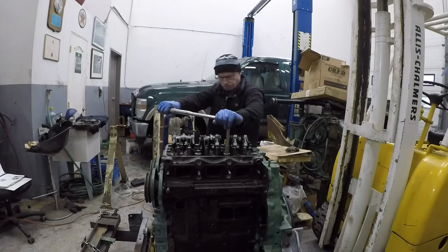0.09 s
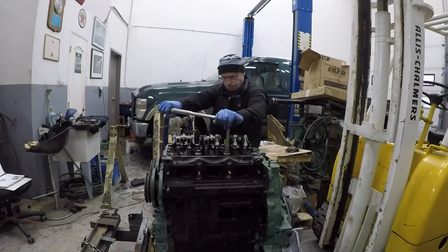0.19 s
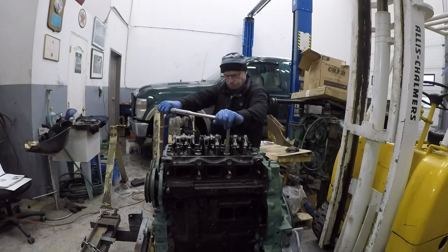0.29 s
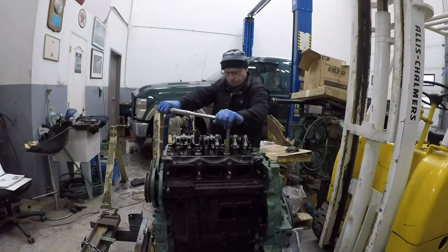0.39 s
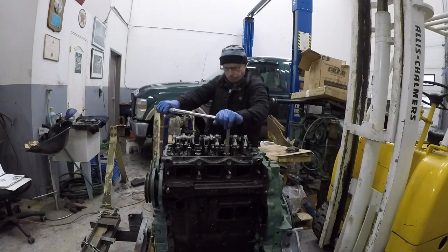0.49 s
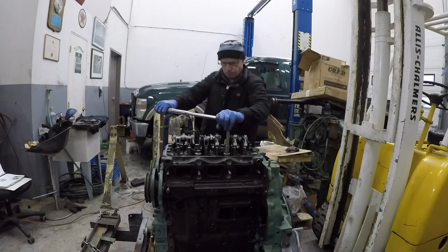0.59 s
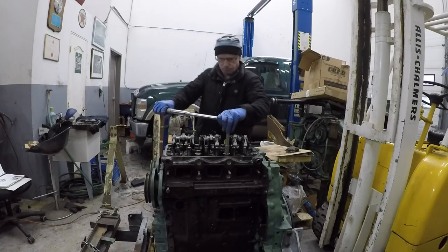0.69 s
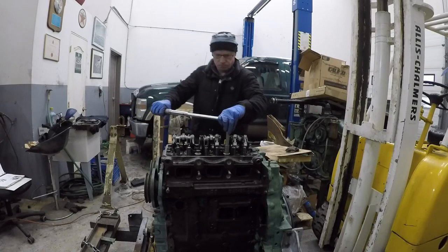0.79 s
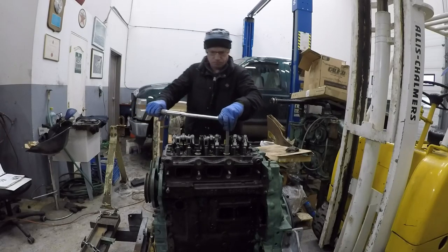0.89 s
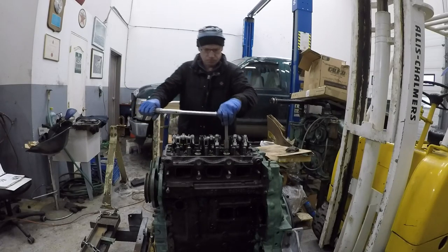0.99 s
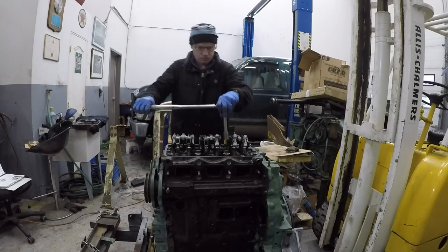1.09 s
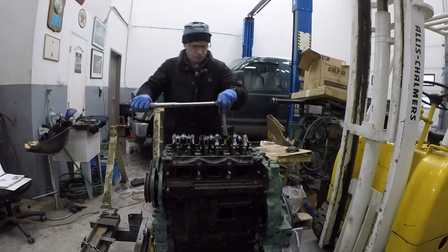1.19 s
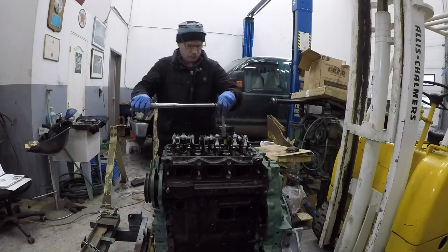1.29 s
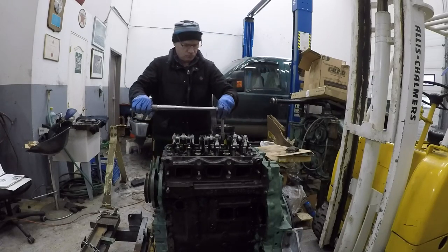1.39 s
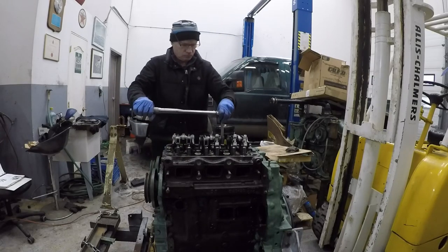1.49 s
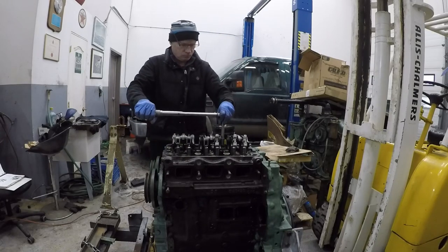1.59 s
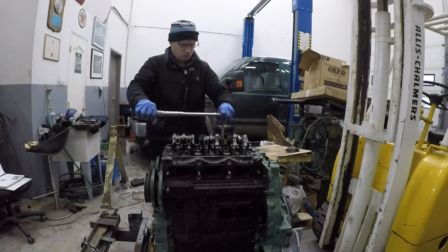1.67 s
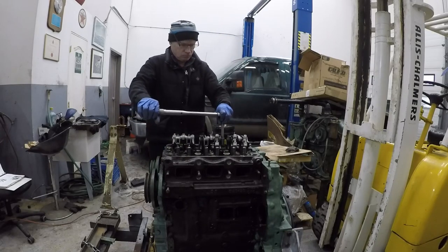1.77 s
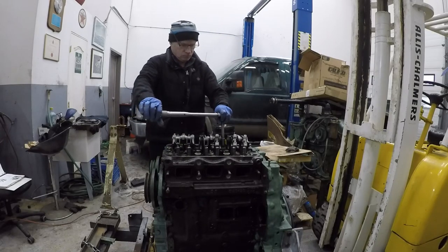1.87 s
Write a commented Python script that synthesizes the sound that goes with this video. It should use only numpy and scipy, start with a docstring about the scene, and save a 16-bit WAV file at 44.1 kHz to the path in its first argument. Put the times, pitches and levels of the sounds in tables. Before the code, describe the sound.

Torque wrench gives two sharp metallic clicks, echoing through a large hard-walled workshop, over low rumble

```python
"""Two sharp metallic clicks in a large hard-walled workshop, each swelling into a long hall tail; soft
handling sounds and light ticks follow over a low room rumble. A click-type torque wrench breaks over on an
engine bolt and snaps back: touches ring steel modes and fire noise cracks. Noise tails make the hall;
banded noise, a low drone and a throbbing whine make the room tone."""
import sys
import numpy as np
from scipy import signal
from scipy.io import wavfile
from scipy.ndimage import map_coordinates

SR = 44100
rng = np.random.default_rng(int(sys.argv[2]) if len(sys.argv) > 2 else 0)


def inscribe(sig):
    """Save sig as 16-bit PCM at rate SR to the path in sys.argv[1].

    A 1-D sig is mono; a 2-D sig holds one channel per row.
    Samples are clipped to [-1, 1] before scaling.
    """
    pcm = np.round(np.clip(np.atleast_2d(sig).T, -1, 1) * 32767)
    wavfile.write(sys.argv[1], SR, pcm.astype(np.int16))


N = 83790

# metal touches as the wrench breaks over, snaps back, ticks: (time [s], level [dB])
BREAK_TOUCHES = [(.2115, -11), (.2128, -27)]
RESET_TOUCHES = [(0.7405, -12), (0.7423, -47)]
TICK_TOUCHES = [(1.7398, -39.5), (1.7408, -42), (1.7427, -38), (1.7443, -46), (1.751, -47), (1.759, -60)]


def from_db(db):
    """Gain of a level."""
    return 10 ** (np.asarray(db) / 20)


def rms_one(x):
    """Scale to unit rms."""
    return x / np.sqrt(np.mean(x ** 2) + 1e-20)


def at_hz(points, hz, column=1):
    """Read a column of a spectrum table on a log-frequency axis."""
    points = np.array(points)
    return np.interp(np.log(hz), np.log(points[:, 0]), points[:, column])


def left_right(balance_db):
    """Column of left and right gains for a left-minus-right level."""
    return from_db([[balance_db / 2], [-balance_db / 2]])


def high_pass(x, order, edge_hz):
    """Butterworth high-pass."""
    return signal.sosfilt(signal.butter(order, edge_hz, "high", fs=SR, output="sos"), x)


def decay_per_sample(t60_s):
    """Factor that loses 60 dB in t60."""
    return from_db(-60 / (t60_s * SR))


def ring(drive, hz, t60_s):
    """Two-pole resonator: a unit click starts a decaying sine of height 1."""
    r = decay_per_sample(t60_s)
    w = 2 * np.pi * hz / SR
    return signal.lfilter([0, np.sin(w)], [1, -2 * r * np.cos(w), r * r], drive + 1e-18)


def noise_bands(size):
    """Third-octave bands of mid and side noise, neighbours unrelated."""
    edges_hz = 22 * 2 ** np.arange(0, 9.9, 1 / 3)
    white = rng.standard_normal((2, 2, size))
    for k, (low, high) in enumerate(zip(edges_hz, edges_hz[1:])):
        band_pass = signal.butter(2, [low, high], "band", fs=SR, output="sos")
        yield np.sqrt(low * high), signal.sosfilt(band_pass, white[k % 2])


def pair(mid_side, alike):
    """Mix mid and side into left and right of a given likeness (correlation)."""
    alike = np.clip(alike, -1, 1)
    mid = np.sqrt(1 + alike) * mid_side[0]
    side = np.sqrt(1 - alike) * mid_side[1]
    return mid + side * np.array([[1], [-1]])


def rumble(swell_db):
    """Unit-rms banded noise; the swell fades out towards the high bands."""
    # room-tone spectrum: (frequency [Hz], relative level per Hz [dB])
    spectrum = [(15, -51.5), (25, -43), (108, -67), (159, -1), (273, -7.5), (330, -7), (410, -9.5),
                (584, -10), (1120, -14), (2460, -27), (2670, -27), (5270, -31.5), (8830, -29.5),
                (14400, -46.5), (16500, -61)]
    # (frequency [Hz], left-right likeness [-1 to 1])
    likeness = [(60, 0.1), (130, -0.28), (290, -0.3), (640, -0.82), (1410, -0.65), (3100, 0.4),
                (6820, 0.08), (15000, 0.23)]
    # (frequency [Hz], left minus right [dB])
    balance = [(60, 2), (110, -0.5), (200, -1.5), (380, 2), (700, -0.5), (1290, -1), (2380, -1.5),
               (4400, 0.5), (8120, -7), (15000, 1.5)]
    half_swell_hz = 1520
    out = 0
    for hz, band in noise_bands(N + SR // 2):
        settled = band[:, -N:]
        band_swell_db = swell_db / (1 + (hz / half_swell_hz) ** 2)
        gain = from_db(at_hz(spectrum, hz) + band_swell_db)
        out = out + gain * pair(settled, at_hz(likeness, hz)) * left_right(at_hz(balance, hz))
    return rms_one(out)


def narrow_noise(hz, width_hz):
    """Stereo noise through a resonator of the given bandwidth."""
    return ring(rng.standard_normal((2, N)), hz, np.log(1000) / np.pi / width_hz)


def drone():
    """Low drone: unit-rms narrow noise, rolled off below its pitch."""
    return rms_one(high_pass(narrow_noise(hz=163, width_hz=15), order=4, edge_hz=144))


def whine():
    """Faint thin whine: unit-rms narrow noise throbbing at mains rate."""
    throb_hz, depth = 60, .9
    throb = 1 + depth * np.sin(2 * np.pi * throb_hz * np.arange(N) / SR)
    return rms_one(narrow_noise(hz=8640, width_hz=45) * throb)


def room_tone():
    """Rumble and drone swell slowly under a steady level of throbbing whine."""
    # room-tone level curve, before the lift: (time [s], level [dB])
    level_curve = [(0.0, -57), (0.12, -55.5), (0.544, -57.5), (0.804, -54), (0.968, -55.5), (1.142, -56.5),
                   (1.798, -54), (1.9, -54.5)]
    lift_db, drone_db, whine_db = 7.5, -62.5, -71
    s, db = np.transpose(level_curve)
    swell_db = np.interp(np.arange(N) / SR, s, db - db.mean())
    out = from_db(db.mean() + lift_db) * rumble(swell_db)
    out = out + from_db(drone_db + swell_db) * drone()
    return out + from_db(whine_db) * whine()


def steel_modes():
    """Each touch rings all bar modes; returns direct sound and near and far feeds.

    Neighbouring modes radiate in different directions, so each feed has two halves.
    """
    # wrench modes: (frequency [Hz], t60 before ring share [s], left minus right [dB],
    # relative level at break [dB], at reset [dB], at tick [dB])
    modes = [(353, 0.026, 16, -47, -33, -31), (426, 0.062, 3, -26, -28, -30),
             (640, 0.026, 24.5, -60, -25.5, -34), (840, 0.014, -12.5, -15, -19.5, -20),
             (1145, 0.0062, 2, -14.5, -11.5, -25), (1495, 0.017, 3, -13, -16, -11),
             (1860, 0.015, 8, -12, -10, -18), (2507, 0.0083, -9, -13, -9, 4.5),
             (3093, 0.018, 12, -24.5, -13, 1), (3290, 0.014, -8, -9, -6.5, -8),
             (3960, 0.016, -12, 0.5, -2, 1), (4250, 0.0077, 33, -12, -1.5, -0.5),
             (4630, 0.0031, -23, -7.5, 2.5, 8.5), (5920, 0.0055, 10, -13, -6.5, -36),
             (6350, 0.0033, 11, -5, 0, 4), (6745, 0.023, -13, -8.5, -13, -18),
             (7120, 0.018, -17, -7.5, -8.5, -4), (7460, 0.017, -16, -9, -6, -6),
             (7875, 0.019, -16, -13, -4.5, -10), (8500, 0.011, -21, -13, -12, -24),
             (9120, 0.0041, -24, -12, -14.5, -7), (9870, 0.0042, -29, -14.5, -18, -28),
             (11320, 0.005, -27, -24.5, -19.5, -10), (12100, .003, -20, -44, -19, -35),
             (13300, 0.0035, -5, -14.5, -14, -20), (15000, .005, -15, -28, -29, -29)]
    # share of t60 left by each contact: (break, reset, tick) [ratio]
    ring_share = [0.72, 0.56, 0.37]
    # feed of near echoes: (break, reset, tick) [dB]
    near_send_db = [-0.7, -4, 1.2]
    # feed of hall tail: (break, reset, tick) [dB]
    far_send_db = [-0.4, -0.5, -4.5]
    strength_spread_db, contact_t60_s = 2, .0012
    # keeps the height of a mode that builds up over a few cycles
    contact_gain = 2 * np.log(1000) / (contact_t60_s * SR)
    direct, near, far = np.zeros((2, N)), np.zeros((2, N)), np.zeros((2, N))
    for kind, touches in enumerate([BREAK_TOUCHES, RESET_TOUCHES, TICK_TOUCHES]):
        s, db = np.transpose(touches)
        at = (s * SR).astype(int)
        spread_db = strength_spread_db * rng.standard_normal((len(s), len(modes)))
        for k, (hz, t60_s, balance_db, *levels_db) in enumerate(modes):
            clicks = np.zeros(N)
            clicks[at] = (-1) ** k * from_db(db + levels_db[kind] + spread_db[:, k])
            push = ring(clicks, hz, contact_t60_s) * contact_gain
            tone = ring(push, hz, t60_s * ring_share[kind])
            direct += tone * left_right(balance_db)
            near[k % 2] += tone * from_db(near_send_db[kind])
            far[k % 2] += tone * from_db(far_send_db[kind])
    return direct, near, far


def cracks():
    """Toneless burst with each touch: differenced noise under a fast decay."""
    # burst level relative to the touch: (break, reset, tick) [dB]
    crack_db = [-33, -21, -17.5]
    t60_s = 0.0053
    clicks = np.zeros(N)
    for kind, touches in enumerate([BREAK_TOUCHES, RESET_TOUCHES, TICK_TOUCHES]):
        s, db = np.transpose(touches)
        clicks[(s * SR).astype(int)] = from_db(db + crack_db[kind])
    envelope = signal.lfilter([1], [1, -decay_per_sample(t60_s)], clicks)
    return envelope * np.diff(rng.standard_normal(N + 1))


def click_ring(s, db, hz, t60_s):
    """One click starts one decaying sine."""
    click = np.zeros(N)
    click[int(s * SR)] = from_db(db)
    return ring(click, hz, t60_s)


def tube_hum():
    """The handle tube hums on after the break as one slowly decaying mode."""
    return click_ring(BREAK_TOUCHES[0][0], db=-54, hz=3925, t60_s=0.3)


def handling():
    """Soft handling sounds, each a single decaying sine."""
    # (time [s], level [dB], pitch [Hz], t60 [s])
    sounds = [(1.548, -45, 6470, 0.0083), (1.549, -49, 8700, 0.0046), (1.552, -50, 3460, 0.019),
              (1.667, -49.5, 800, 0.049)]
    return sum(click_ring(*sound) for sound in sounds)


def wrench():
    """Sum the contact sounds into direct stereo, near feed and far feed."""
    left_lead_s = .00003
    direct, near, far = steel_modes()
    rest = cracks() + tube_hum() + handling()
    direct += rest
    direct[0] = map_coordinates(direct[0], [np.arange(N) + left_lead_s * SR], order=3)
    return direct, near + rest / 2, far + rest / 2


def hall(near_feed, far_feed):
    """Echoes off engine and floor die fast; the far walls' diffuse tail builds up, then fades by band."""
    # hall tail: (frequency [Hz], t60 [s], relative level [dB], left-right likeness [-1 to 1])
    tail_bands = [(370, 0.56, -19, 1), (650, 1.31, -26, 0.7), (1320, 0.99, -12, 0.029),
                  (2360, 1.045, -8, 0.29), (3460, 1.014, -23.5, 0.94), (4460, 1.065, -16.5, 0.74),
                  (6100, 0.81, -5.5, -0.12), (7940, 0.61, -12, -0.28), (11900, 0.56, 6.5, -0.1),
                  (14200, 0.25, -44.5, -0.17)]
    near_db, near_balance_db, near_t60_s, near_start_s = 9, -3, 0.074, .002
    build_s = 0.044
    t = np.arange(N) / SR
    near_decay = from_db(near_db - 60 * t / near_t60_s) * (t > near_start_s)
    near = left_right(near_balance_db) * near_decay
    build = 1 - np.exp(-(t / build_s) ** 2)
    out = 0
    for near_half, far_half in zip(near_feed, far_feed):
        echoes, tail = 0, 0
        for hz, band in noise_bands(N):
            level = from_db(at_hz(tail_bands, hz, column=2))
            stereo = level * pair(band, at_hz(tail_bands, hz, column=3))
            echoes = echoes + near * stereo
            tail = tail + build * from_db(-60 * t / at_hz(tail_bands, hz)) * stereo
        out = out + signal.fftconvolve(near_half[None], echoes, axes=1)
        out = out + signal.fftconvolve(far_half[None], tail, axes=1)
    return out[:, :N] / np.sqrt(SR / 10)


def scene():
    """Wrench and its hall over room tone; the slim bar radiates little low sound."""
    hall_db, low_edge_hz = 17.5, 210
    direct, near_feed, far_feed = wrench()
    clicks = direct + from_db(hall_db) * hall(near_feed, far_feed)
    return high_pass(clicks, 2, low_edge_hz) + room_tone()


def record(dry):
    """Peaks are rounded, the top is cut."""
    overload, cutoff_hz = .95, 16800
    rounded = dry / (1 + (dry / overload) ** 6) ** (1 / 6)
    low_pass = signal.cheby2(20, 60, cutoff_hz, fs=SR, output="sos")
    return .97 * signal.sosfilt(low_pass, rounded)


dry = scene()
out = record(dry)
inscribe(out)
```